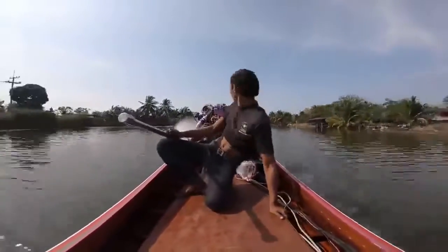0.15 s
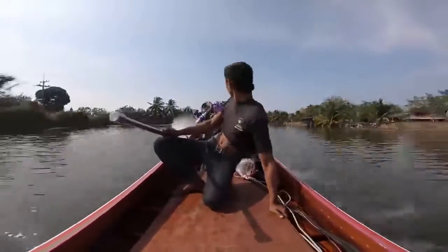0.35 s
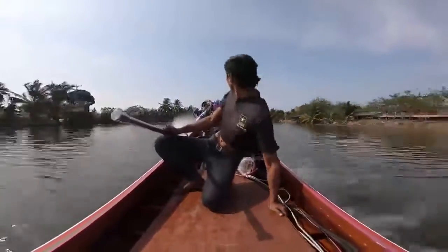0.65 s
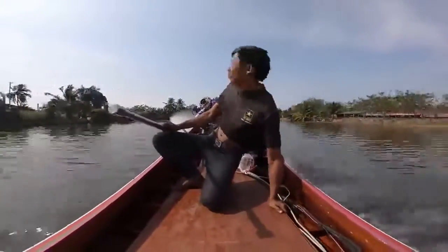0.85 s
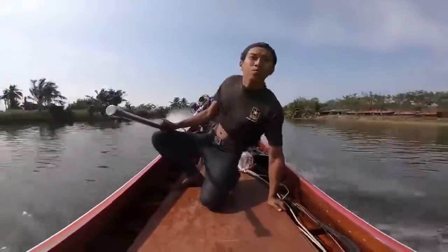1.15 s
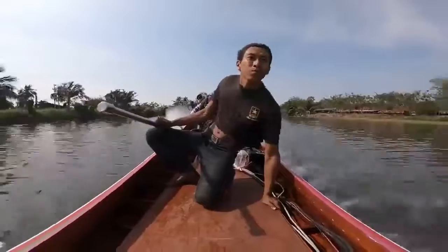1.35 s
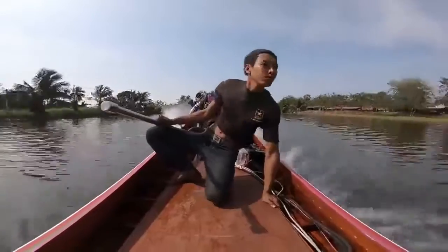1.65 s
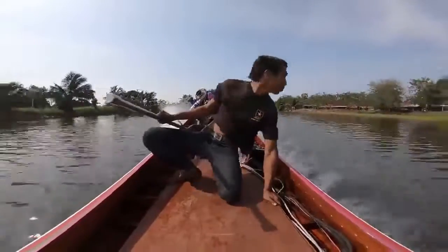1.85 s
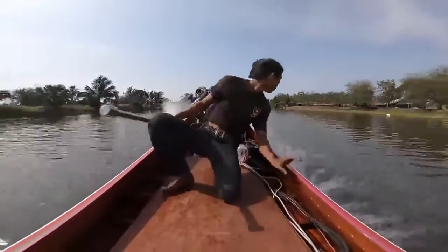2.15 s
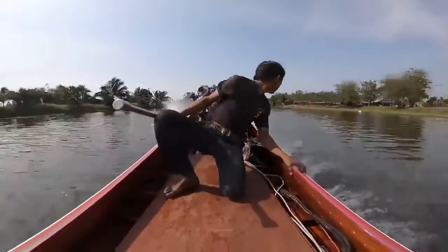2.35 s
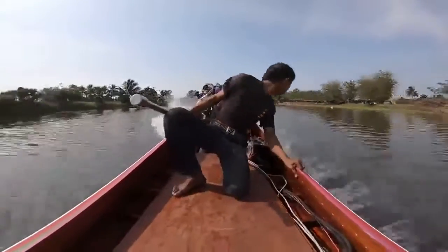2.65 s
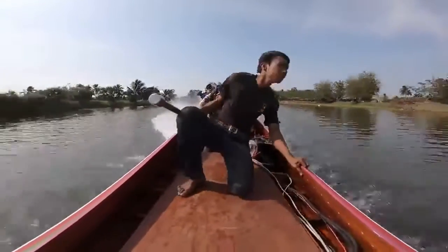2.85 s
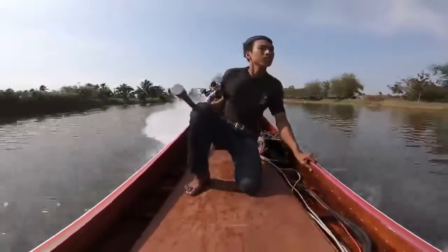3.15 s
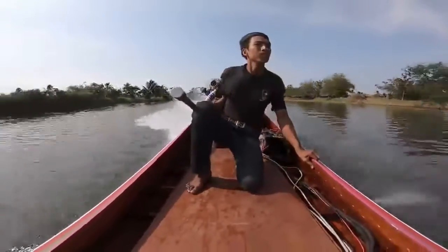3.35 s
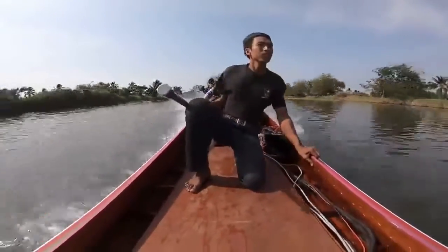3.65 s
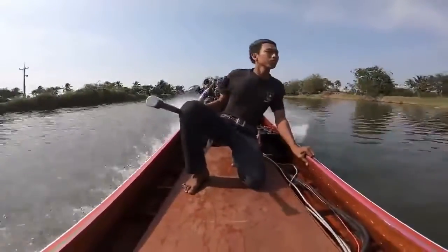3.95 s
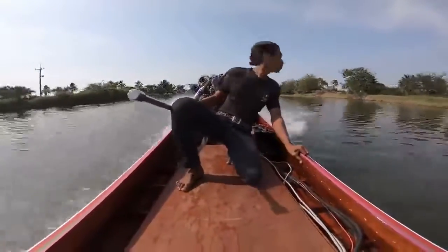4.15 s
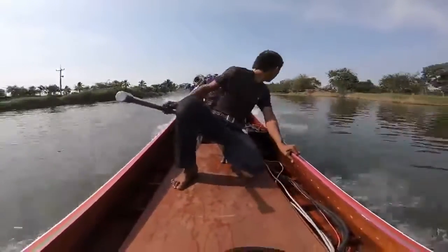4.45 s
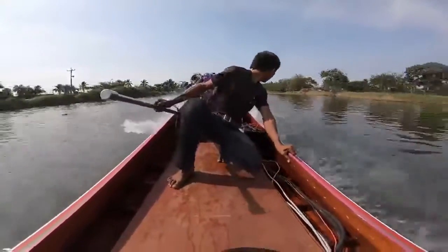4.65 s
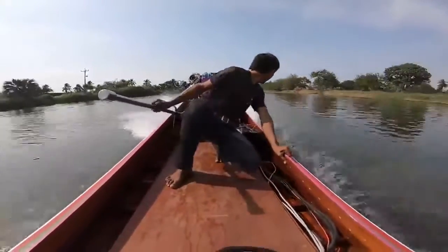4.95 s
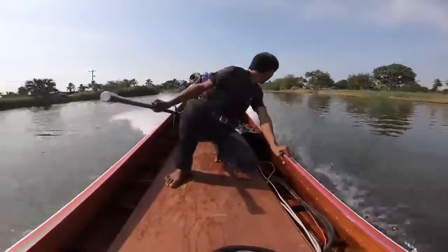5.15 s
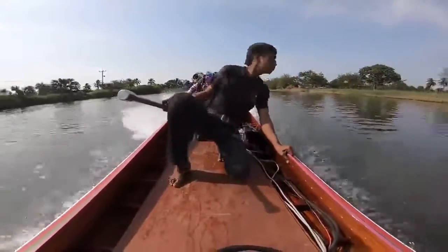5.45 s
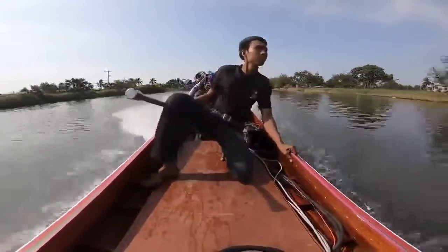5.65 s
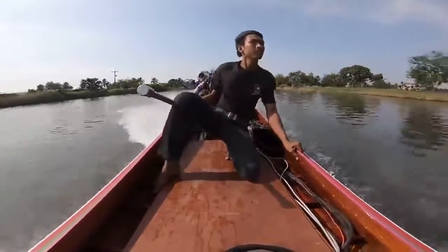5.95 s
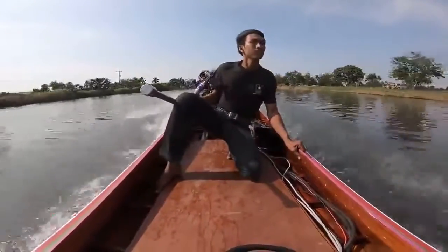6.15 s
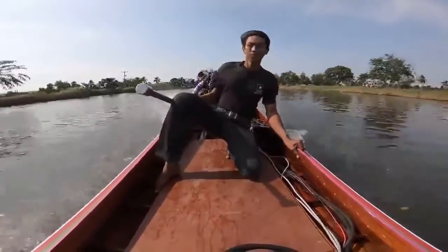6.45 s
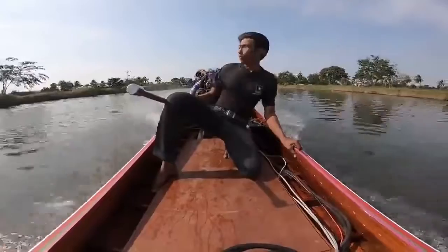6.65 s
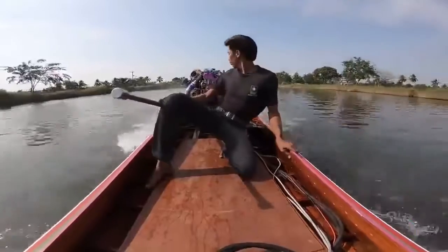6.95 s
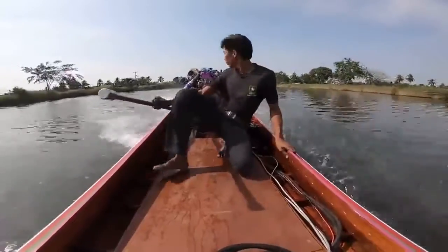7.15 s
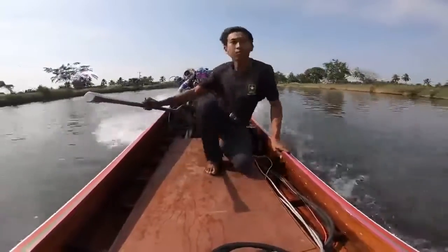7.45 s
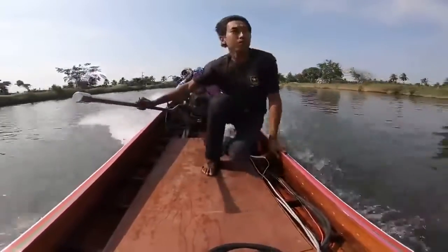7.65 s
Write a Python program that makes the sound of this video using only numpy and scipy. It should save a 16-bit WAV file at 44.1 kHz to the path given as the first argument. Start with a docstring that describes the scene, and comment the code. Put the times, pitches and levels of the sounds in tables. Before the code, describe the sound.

A turbo-diesel long-tail boat speeds along a canal, heard from the bow. Deep wind buffets the microphone, strongest at first, over a loud, ragged exhaust rumble. In the first 0.7 seconds the turbocharger dumps a loud, spitting gush of air; its high whistle then falls steadily until about 3 seconds. Hard exhaust puffs stand out near 1.2, 1.5 and 2.2 seconds. Four short throttle pushes between 2 and 3.8 seconds firm the rumble into low rising drones. From 3 seconds a breathy, fluttering turbo whistle climbs in surges with puffs of air, then coasts down between 4.4 and 5.4. From about 5 seconds to the end, near 7.8, throttle jabs come roughly every 0.4 seconds, soon lifting the whistle each time. Wind gusts thump again near 4.1 and 6.6 seconds. Throughout, the engine clatters and knocks in the hull, with water wash and faint spray.

```python
"""On a canal, microphone at the bow of a racing turbo-diesel long-tail boat.
Wind buffets the microphone. From astern the exhaust rumbles, and firms into a rising drone at
each push of the throttle. The turbocharger runs down from a loud gush of air; then surges of
boost spin it up, whistling, and it coasts again. The engine clatters and knocks in the hull,
and water hisses past close by."""
import sys
import numpy as np
from scipy import signal
from scipy.fft import rfft, irfft, next_fast_len
from scipy.io import wavfile
from scipy.ndimage import uniform_filter1d, minimum_filter1d

SR = 44100
rng = np.random.default_rng(int(sys.argv[2]) if len(sys.argv) > 2 else 0)


def to_wav(s):
    """Save 16-bit WAV."""
    ch = np.atleast_2d(s).T  # columns
    pcm = np.round(np.clip(ch, -1, 1) * 32767)  # PCM
    wavfile.write(sys.argv[1], SR, pcm.astype(np.int16))


N = 343539
T = np.arange(N) / SR

# Table levels are relative: the functions add their own trims.
# throttle pushes, with the exhaust's harmonics: start_s, length_s, from_hz, to_hz, h1_db, h2_db, h3_db
PUSHES = [(2.031, 0.32, 53.67, 66, -37, -18.5, -23), (2.839, 0.19, 75.46, 86, -21.5, -21, -33),
          (3.099, 0.27, 66.63, 81.5, -17.5, -20, -27), (3.579, 0.19, 73, 89, -16, -24, -32),
          (5.093, 0.18, 60.1, 67, -24, -23, -30), (5.499, 0.16, 56.16, 69.6, -17.5, -23, -24),
          (5.929, 0.2135, 59.53, 69.7, -18, -20, -23), (6.311, 0.24, 60.03, 73, -15, -19, -22),
          (6.683, 0.18, 65.75, 72.4, -14.5, -20.5, -21), (7.07, 0.2, 65.3, 72.5, -22, -20, -24),
          (7.465, 0.27, 54.35, 58, -31, -20.5, -23)]
PUSH_FADE_S = 0.031
# the exhaust's low boom and higher bark: time_s, boom_db, bark_db
EXHAUST = [(0, -25.5, -18.5), (.7, -20.5, -20.5), (1.25, -15.5, -17.5), (1.6, -19.5, -18), (2.3, -20, -18),
           (3.0, -20, -17.5), (3.7, -18, -20), (4.2, -19.5, -18.5), (4.55, -21, -23.5), (4.9, -19.5, -18.5),
           (5.4, -24, -21), (6.2, -19, -20), (7.0, -20, -23), (7.79, -20, -18)]
# its raspy upper edge: time_s, level_db
RASP = [(0.0, -30.5), (1.34, -33), (1.56, -28.5), (2.19, -33.5), (2.99, -30.5), (3.08, -36.5), (3.12, -37),
        (3.82, -33), (5.42, -39.5), (5.62, -34.5), (5.81, -38), (6.03, -34.5), (7.07, -40.5), (7.12, -29),
        (7.44, -46), (7.79, -29)]
# hard puffs that stick out of the rumble: start_s, level_db
BLATS = [(1.247, -8), (1.532, -6.5), (1.65, -12), (1.687, -18), (2.239, -9), (3.253, -16), (3.289, -10.5),
         (5.176, -17.5), (5.859, -19), (6.236, -8)]
# spectrum of exhaust and wind: frequency_hz, level_db
RUMBLE_COLOUR = [(6, -33.5), (15, -16.5), (30, 3.5), (70, 2.5), (150, -2.5), (210, -8), (255, -13),
                 (310, -19), (345, -27.5), (400, -43.5), (450, -37.5), (560, -50), (800, -70), (1500, -100)]

# the unloaded rotor's sinking whistle: time_s, pitch_hz, level_db
RUNDOWN = [(.55, 8400, -44), (.7, 7750, -38), (.8, 7260, -39), (.93, 6850, -35), (1.07, 6380, -33),
           (1.17, 6140, -30), (1.26, 5880, -40.5), (1.5, 5490, -37), (1.72, 4980, -45), (1.999, 4494, -46),
           (2.359, 3900, -51), (2.42, 3810, -41), (2.55, 3720, -48.5), (2.72, 3690, -51),
           (2.831, 3305, -54), (2.97, 3190, -45)]
# surges of boost, pitched by the upper whistle:
# start_s, length_s, from_hz, to_hz, upper_db, lower_db, hiss_share
SURGES = [(2.97, 0.09, 5390, 5620, -47.5, -51.5, 0.1), (3.181, .155, 5480, 6000, -41, -59, 0.3),
          (3.579, .19, 5880, 6900, -44, -53, 0.91), (3.79, .04, 6765, 6800, -48, -42, 0.57),
          (4.07, 0.083, 6340, 6245, -46, -39.5, .5), (4.226, 0.068, 6320, 6350, -40.5, -39, 0.63),
          (5.531, 0.0797, 5146, 5380, -44, -62, .8), (5.97, .17, 5060, 5430, -39, -62, .8),
          (6.33, .21, 5310, 5850, -38, -62, 1), (6.718, 0.13, 5600, 5960, -36, -49, .9),
          (7.059, 0.15, 5745, 5900, -37, -61, .3), (7.5, 0.087, 5450, 5400, -37.5, -60, 0.37)]
# the upper whistle before the first surge and after the last: time_s, pitch_hz
COAST_ENDS = [(2.4, 6570), (7.79, 5357)]
# the upper whistle between surges: time_s, level_db
COAST = [(2.4, -55), (2.85, -59), (3.1, -52), (3.4, -52), (3.8, -53), (3.97, -48), (4.2, -47),
         (4.38, -41.5), (4.55, -46.5), (4.9, -50.5), (5.2, -49), (5.45, -62), (5.8, -51), (6.25, -51),
         (6.65, -47), (7.0, -40), (7.27, -39.5), (7.35, -35.5), (7.43, -42), (7.79, -41)]
# duct bands that lift or weaken a passing whistle: centre_hz, width_hz, gain_db
DUCT = [(3640, 110, 3), (6440, 140, -2)]
# puffs from the compressor: time_s, centre_hz, level_db, length_s
PUFFS = [(3.328, 6000, -37, 0.022), (3.74, 6300, -36, .035), (3.87, 6200, -39, 0.045),
         (4.13, 5900, -37, 0.044), (4.292, 6300, -34, 0.046), (5.589, 5600, -40, 0.038),
         (5.852, 6200, -44, 0.056), (6.121, 5700, -44, .04), (6.331, 6100, -40, .05),
         (6.511, 5900, -35.5, .05), (6.8, 5950, -37, 0.067), (7.195, 5830, -29.5, 0.049),
         (7.55, 5800, -35, 0.052)]
# the intake's hoot: time_s, pitch_hz, level_db
HOOT = [(5.0, 3186, -52), (5.5, 3076, -58), (5.75, 3056, -49), (6.001, 2950, -44.5), (6.12, 3096, -52),
        (6.328, 3140, -41.5), (6.6, 3096, -52), (6.901, 3088, -47), (7.4, 3156, -48.5), (7.79, 3140, -48)]

# the wide gush as the turbocharger unloads: time_s, level_db
GUSH = [(0, -39), (0.199, -27), (.33, -31), (.5, -29.5), (.65, -43), (.9, -39), (1.3, -66), (2, -86)]
# short spits of air: time_s, level_db, length_s
SPITS = [(0.102, -16, 0.013), (0.38, -21, 0.036), (.467, -37, .012), (.595, -20.5, 0.014),
         (1.505, -39, .025), (2.011, -38, 0.034), (4.77, -38, 0.037)]
# spectrum of gush and spits: frequency_hz, level_db
GUSH_COLOUR = [(1000, -40), (1650, -6), (2200, -23.5), (3200, -12.5), (4200, -5), (5800, 3.5), (7200, -1.5),
               (8300, -9.5), (9000, -22), (10400, -22.5), (11000, -33), (13300, -31.5), (14500, -44)]
# air rushing into the turbocharger: time_s, level_db
INTAKE = [(0.0, -25), (0.48, -30.5), (1.08, -34), (2.13, -40.5), (2.93, -43.5), (3.32, -40), (3.41, -44),
          (3.75, -38), (3.84, -40.5), (4.32, -37.5), (5.19, -42), (6.44, -36), (7.1, -36), (7.79, -37)]
# spectrum of that rush: frequency_hz, level_db
INTAKE_COLOUR = [(1000, -20), (3000, -11.5), (3900, -3.5), (4600, -7.5), (5400, -2), (6250, -1),
                 (6900, -6.5), (7700, -12), (8300, -16.5), (8700, -35.5), (10500, -34.5), (12000, -58)]

# the hull's low resonances: centre_hz, width_hz, level_db
LOW_MODES = [(390.3, 40, 4), (481, 31, -12.5)]
# its boxy resonances: centre_hz, width_hz, level_db
BOXY_MODES = [(738, 23, 0.5), (740, 50, -19.5), (887, 28, -8)]
# steady knocking in the hull: time_s, low_db, boxy_db
STEADY_KNOCK = [(0, -49, -50), (1.2, -41.5, -51.5), (2.6, -49, -55), (3.4, -46.5, -51.5), (4.6, -50, -53.5),
                (5.4, -52, -54), (5.95, -54, -55.5), (6.2, -47, -49), (7.2, -47, -49.5),
                (7.45, -48.5, -49.5), (7.79, -48, -56)]
# the hardest bouts of knocking: time_s, low_db, boxy_db
KNOCK_BOUTS = [(0.0, -53, -48), (.35, -44, -50), (.56, -44, -52), (1.0, -43, -58), (1.52, -43, -46),
               (1.74, -41, -51), (2.1, -38, -62), (3.5, -41, -64), (3.73, -40.5, -41.5), (4.06, -43, -52),
               (4.35, -45, -55), (4.84, -47, -47), (5.01, -42, -41), (6.12, -44, -51), (6.351, -42, -48),
               (6.639, -39.5, -66), (6.79, -40, -46), (6.95, -45, -50), (7.119, -46, -54), (7.7, -36, -50)]
# engine clatter and wash on the hull: time_s, level_db
WASH = [(0.0, -37.5), (0.56, -41), (2.8, -43.5), (3.69, -41), (5.47, -44), (5.6, -39), (5.64, -42),
        (5.99, -40), (7.66, -42), (7.79, -39)]
# spectrum of clatter and wash: frequency_hz, level_db
CLATTER_COLOUR = [(300, -25.5), (410, -13.5), (480, 2), (570, 6), (660, 4.5), (740, -14), (810, -1),
                  (920, -4), (1050, -0.5), (1300, -2.5), (1550, 1.5), (1750, 3), (2700, 1.5), (4300, -2.5),
                  (8000, -24)]

# steady wind at the microphone: time_s, level_db
WIND = [(0, -16.5), (.9, -21), (1.6, -21), (2.6, -22.5), (4.3, -25), (5.2, -25.5), (6.2, -24.5),
        (7.79, -31)]
# gusts that thump it: time_s, level_db, length_s
GUSTS = [(.21, -15.5, 0.095), (.37, -11.5, 0.045), (.87, -14, 0.079), (1.36, -13, 0.043),
         (4.08, -12.5, 0.051), (4.41, -23, 0.056), (6.63, -11.5, 0.04)]
# fine spray: time_s, level_db
SPRAY = [(0, -48), (.3, -52), (.8, -67), (1.6, -74.5), (2.8, -71.5), (3.25, -65), (3.75, -64.5),
         (4.0, -68.5), (5.1, -72), (5.55, -65.5), (5.9, -65), (6.1, -63), (6.35, -67), (6.701, -71),
         (7.2, -71), (7.79, -62)]
# spectrum of the spray: frequency_hz, level_db
SPRAY_COLOUR = [(4000, -19.5), (8500, 3), (10400, -8), (11000, -5.5), (13000, -7), (14500, -17),
                (16000, -35.5)]


def firing_turns(jitter=0.013, hunt=0.0563):
    """Running count of exhaust cycles: the beat climbs in each push, hunts between, and is never even."""
    hz = curves(ramps(PUSHES))[0]
    hunting = 1 + hunt * (1 - load()) * drift(5.94)
    return np.cumsum(hz * hunting * (1 + jitter * drift(33))) / SR


def load():
    """1 while the throttle is pushed, 0 between the pushes."""
    return np.minimum(sum(gate(s, s + length, PUSH_FADE_S) for s, length, *_ in PUSHES), 1)


def exhaust_drone(turns, trim_db=-2.5, fourth_db=-16, waver_db=3.0):
    """Under load the exhaust pulses line up: four harmonics that make one sharp pressure dip a cycle."""
    levels = sum(amp(dbs)[:, None] * gate(s, s + length, PUSH_FADE_S) for s, length, _, _, *dbs in PUSHES)
    levels = [*levels, levels[2] * amp(fourth_db)]
    return [-np.sqrt(2) * level * amp(trim_db + waver_db * drift(26)) * np.cos(2 * np.pi * k * turns)
            for k, level in enumerate(levels, 1)]


def exhaust_rumble(harmonics, bark_db=0.53, lurch_db=1.5, floor=0.48, lift_after_s=0.048, lift_s=0.073):
    """Exhaust power that is not in the drone comes as ragged rumble with a raspy upper edge."""
    # the exhaust dips 1 dB as the throttle is lifted after each push
    dip_db = swells([(s + length + lift_after_s, 0, lift_s) for s, length, *_ in PUSHES])
    boom, bark = amp(curves(EXHAUST) - dip_db)
    bands = [(boom, harmonics[0], 54, 108), (amp(bark_db) * bark, sum(harmonics[1:]), 112, 232)]
    out = 0
    for level, tone, lo_hz, hi_hz in bands:
        drone_power = uniform_filter1d(tone ** 2, size=2000)
        ragged = np.sqrt(np.maximum(level ** 2 - drone_power, (floor * level) ** 2))
        out += ragged * amp(lurch_db * drift(11)) * low_noise(lo_hz, hi_hz, steady_s=0.13)
    return out + amp(curves(RASP)[0]) * low_noise(258.4, 1500, steady_s=0.097)


def exhaust_blats(trim_db=-5.5, rise_s=0.01):
    """Single hard exhaust puffs: a quick rise and a slower fall of low noise."""
    ages = [(np.maximum(T - s, 0) / rise_s, db) for s, db in BLATS]
    level = sum(amp(db + trim_db) * age * np.exp(1 - age) for age, db in ages)
    return level * low_noise(127, 400, steady_s=0.016)


def turbo_rundown(turns, hiss_db=2.5, flicker_db=2.0, hiss_ratio=0.94):
    """The unloaded rotor's falling whistle; gushing air tears it into hiss that trails just below it."""
    hz, db = curves(RUNDOWN)
    hiss_share = np.clip(amp(curves(GUSH)[0] + 35.5), 0, 0.75)
    clean = whistle(hz, turns, tone_db=-1.5, fuzz_db=-2.5, width_hz=68, flutter_db=0.5)
    hiss = amp(hiss_db) * skirt(hiss_ratio * hz, width_hz=430)
    level = amp(db + flicker_db * drift(24)) * gate(RUNDOWN[0][0], RUNDOWN[-1][0], fade_s=0.042)
    return level * blend(clean, hiss, hiss_share)


def turbo_boost(turns, flicker_db=2.0, pitch_ratio=1.692):
    """The driven rotor's two whistles, the upper one breathy as it spins up."""
    hz = rotor_pitch()
    upper_gain, lower_gain, hiss_share = surge_levels()
    clean = whistle(hz, turns, tone_db=0, fuzz_db=-2.5, width_hz=78, flutter_db=1.0)
    hiss = gulps(turns) * skirt(hz, width_hz=175)
    upper = amp(flicker_db * drift(7.1)) * blend(clean, hiss, hiss_share)
    lower = whistle(hz / pitch_ratio, turns, tone_db=2.0, fuzz_db=-2.0, width_hz=130, flutter_db=1.0)
    return upper_gain * upper + lower_gain * lower


def rotor_pitch(spin_bend=1.15, coast_bend=0.86):
    """The upper whistle's pitch: the rotor spins up with a lag and, coasting, slows fastest at first."""
    times, pitches = np.transpose([COAST_ENDS[0], *ramps(SURGES), COAST_ENDS[1]])
    legs = np.arange(len(times))
    leg, progress = np.divmod(np.interp(T, times, legs), 1)
    bend = np.where(leg % 2, spin_bend, coast_bend)  # odd legs are surges
    return np.interp(leg + progress ** bend, legs, pitches)


def surge_levels(attack_s=0.03, upper_db_per_s=221, lower_db_per_s=48, coast_lower_db=-58.5):
    """Each surge makes the rotor sing, then fade: gives both whistles' gains and the share of hiss."""
    coasting = gate(COAST_ENDS[0][0], COAST_ENDS[1][0], fade_s=0.05)
    gains = amp([curves(COAST)[0], np.full(N, coast_lower_db)]) * coasting
    hiss_share = 0.06  # between surges
    for s, length, _, _, upper_db, lower_db, share in SURGES:
        attack = np.clip((T - s) / attack_s + 1, 0, 1)
        after_s = np.maximum(T - s - length, 0)
        faded = amp([upper_db - upper_db_per_s * after_s, lower_db - lower_db_per_s * after_s])
        gains = np.maximum(gains, attack * faded)
        hiss_share = np.maximum(hiss_share, share * gate(s + attack_s, s + length, fade_s=0.049))
    return *gains, hiss_share


def whistle(hz, turns, tone_db, fuzz_db, width_hz, flutter_db):
    """A rotor's tone in a skirt of turbulent air, pulsing with the engine and shaped by the duct."""
    angle = 2 * np.pi * np.cumsum(hz * (1 + 0.002 * drift(90))) / SR
    tone = np.sqrt(2) * np.cos(angle) * unit(amp(flutter_db * drift(32)))
    duct = amp(sum(db * np.exp(-((hz - centre) / width) ** 2) for centre, width, db in DUCT))
    return duct * gulps(turns) * (amp(tone_db) * tone + amp(fuzz_db) * skirt(hz, width_hz))


def gulps(turns, depth=0.32):
    """The engine draws air in gulps, one each cycle, which chop the whistles into beads."""
    return unit(np.exp(depth * np.cos(2 * np.pi * turns)))


def compressor_puffs(turns):
    """Short puffs of air from the compressor, each a band of hiss."""
    level = swells([(s, db, length) for s, _, db, length in PUFFS])
    return level * gulps(turns) * skirt(curves(PUFFS)[0], width_hz=410)


def intake_hoot(turns):
    """A faint, hollow hoot of intake air, more breath than tone."""
    hz, db = curves(HOOT)
    level = amp(db) * gate(HOOT[0][0], HOOT[-1][0], fade_s=0.05)
    return level * whistle(hz, turns, tone_db=-15, fuzz_db=1, width_hz=70, flutter_db=7.0)


def turbo_air(turns, spit_db=-3, floor=0.42):
    """Air gushes, spits and rushes through the turbocharger; the rush gives way to the gush."""
    intake, gush = amp(curves(INTAKE)[0]), amp(curves(GUSH)[0])
    rush = np.sqrt(np.maximum(intake ** 2 - gush ** 2, (floor * intake) ** 2))
    outflow = np.hypot(gush, amp(spit_db) * swells(SPITS))
    hiss = outflow * patchy(colour(noise(), GUSH_COLOUR), patch_db=3.5)
    hiss += rush * patchy(colour(noise(), INTAKE_COLOUR), patch_db=2.5)
    return hiss * throb(turns, depth=0.093, flutter_db=1.1)


def hull_knock(turns, low_db=-1, boxy_db=0.5, load_db=2, uneven_db=1.5):
    """Uneven blows of combustion ring the hull's resonances, harder while the throttle is pushed."""
    blows = noise() * throb(turns, depth=0.3, flutter_db=3.0)
    steady_db = curves(STEADY_KNOCK) + load_db * load()
    groups = zip([LOW_MODES, BOXY_MODES], steady_db, bouts(), [low_db, boxy_db])
    out = 0
    for modes, level_db, bout, trim_db in groups:
        rings = sum(amp(db) * unit(band(blows, hz - width / 2, hz + width / 2, order=20))
                    for hz, width, db in modes)
        level = np.hypot(amp(level_db + uneven_db * drift(5.5)), bout)
        out += amp(trim_db) * level * steadied(rings, seconds=0.25)
    return out


def bouts(length_s=0.058):
    """Strength of the bouts of knocking in the low and in the boxy resonances."""
    low = swells([(s, db, length_s) for s, db, _ in KNOCK_BOUTS])
    boxy = swells([(s, db, length_s) for s, _, db in KNOCK_BOUTS])
    return low, boxy


def clatter(turns, trim_db=2, notch_hz=566, load_db=-0.16, bout_db=3):
    """Engine clatter and water wash swell with the knocking; a dull, inverted hull echo hollows them."""
    wash = patchy(noise(), patch_db=2) * throb(turns, depth=0.038, flutter_db=0.63)
    delay_s = (1 + 0.012 * drift(4)) / notch_hz
    echo = 0.85 * np.interp(T - delay_s, T, band(wash, 20, 1500, order=6))
    steady = amp(curves(WASH)[0] + trim_db + load_db * load())
    level = np.hypot(steady, amp(bout_db) * bouts()[1])
    return level * unit(band(colour(wash - echo, CLATTER_COLOUR), 200, 7500))


def throb(turns, depth, flutter_db):
    """Noise swells with each firing, twice a cycle, and flutters at random."""
    beat = np.cos(2 * np.pi * turns) + np.cos(4 * np.pi * turns)
    return unit(np.exp(depth * beat) * amp(flutter_db * drift(17)))


def bow_wind():
    """Wind right on the microphone: deep, steady buffeting and thumping gusts."""
    level = np.hypot(amp(curves(WIND)[0]), swells(GUSTS))
    return level * low_noise(5.8, 55, steady_s=0.22)


def spray(turns, trim_db=3.0):
    """A fine fizz of spray, pulsing slightly with the engine."""
    level = amp(curves(SPRAY)[0] + trim_db) * throb(turns, depth=0.1, flutter_db=1.0)
    return level * unit(colour(noise(), SPRAY_COLOUR))


def low_noise(lo_hz, hi_hz, steady_s):
    """One band of the rumble's spectrum, at an even level."""
    return steadied(band(colour(noise(), RUMBLE_COLOUR), lo_hz, hi_hz), steady_s)


def skirt(hz, width_hz):
    """Turbulent air: a narrow band of noise that follows a pitch."""
    angle = 2 * np.pi * np.cumsum(hz) / SR
    return drift(width_hz) * np.cos(angle) + drift(width_hz) * np.sin(angle)


def patchy(x, patch_db):
    """Gives hiss a fine grain: narrow bands swell and fade at random for a few hundredths of a second."""
    spectra = signal.stft(x, nperseg=1024, noverlap=768)[2]
    patches = uniform_filter1d(rng.standard_normal(spectra.shape), size=3, axis=0)  # across frequency
    patches = unit(uniform_filter1d(patches, size=8, axis=1))  # across time
    return unit(signal.istft(spectra * amp(patch_db * patches), nperseg=1024, noverlap=768)[1][:N])


def noise():
    """White noise."""
    return rng.standard_normal(N)


def drift(rate_hz):
    """Random wandering of rms 1, up to the given rate."""
    return unit(band(noise(), rate_hz / 20, rate_hz, order=2))


def steadied(x, seconds):
    """Evens out the slow swells of a random sound, leaving its quick ones."""
    size = int(seconds * SR)
    return x / np.sqrt(uniform_filter1d(uniform_filter1d(x ** 2, size), size) + 1e-12)


def colour(x, points):
    """Filters by a spectrum drawn on a log-frequency axis."""
    size = next_fast_len(N)
    hz, db = np.transpose(points)
    f = np.fft.rfftfreq(size, 1 / SR)
    return irfft(rfft(x, size) * amp(np.interp(np.log(f + 1), np.log(hz), db)), size)[:N]


def band(x, lo_hz, hi_hz, order=8):
    """Smooth band-pass without delay."""
    size = next_fast_len(N)
    f = np.fft.rfftfreq(size, 1 / SR) + 0.01
    loss = np.sqrt((1 + (lo_hz / f) ** (2 * order)) * (1 + (f / hi_hz) ** (2 * order)))
    return irfft(rfft(x, size) / loss, size)[:N]


def blend(clean, hiss, share):
    """Equal-power mix of a whistle and its hiss."""
    return np.sqrt(1 - share) * clean + np.sqrt(share) * hiss


def ramps(rows):
    """The start and end of each row's glide, as time_s, pitch_hz."""
    return [point for s, length, from_hz, to_hz, *_ in rows
            for point in [(s, from_hz), (s + length, to_hz)]]


def curves(rows):
    """Each column of a table, joined by straight lines in time."""
    s, *columns = np.transpose(rows)
    return [np.interp(T, s, column) for column in columns]


def swells(rows):
    """A bell-shaped rise and fall of level for each row."""
    return sum(amp(db) * np.exp(-2 * ((T - s) / length) ** 2) for s, db, length in rows)


def gate(start_s, end_s, fade_s):
    """1 from start to end, with soft edges."""
    return np.clip(np.minimum(T - start_s, end_s - T) / fade_s + 1, 0, 1)


def amp(db):
    """Decibels to gain."""
    return 10 ** (np.asarray(db) / 20)


def unit(x):
    """Scales to rms 1."""
    return x / np.sqrt(np.mean(x ** 2) + 1e-20)


def scene():
    """Exhaust, wind, hull, turbocharger and spray as they reach the bow, in mono."""
    turns = firing_turns()
    harmonics = exhaust_drone(turns)
    wind = bow_wind()
    exhaust = sum(harmonics) + exhaust_rumble(harmonics) + exhaust_blats()
    hull = hull_knock(turns) + clatter(turns)
    hiss = turbo_air(turns) + spray(turns)
    turbo = turbo_rundown(turns) + turbo_boost(turns) + compressor_puffs(turns) + intake_hoot(turns)
    return (exhaust + turbo + hull + hiss + wind)[None]


def record(dry, ceiling=0.59, cutoff_hz=15600):
    """After the microphone, a limiter eases down the highest crests and a low-pass trims the top."""
    gain = np.minimum(1, ceiling / (abs(dry[0]) + 1e-9))
    gain = uniform_filter1d(minimum_filter1d(gain, size=700), size=700)
    low_pass = signal.firwin(511, cutoff_hz, window=("kaiser", 9), fs=SR)
    return signal.oaconvolve(dry * gain, low_pass[None], "same")


dry = scene()
out = record(dry)
to_wav(out)
```